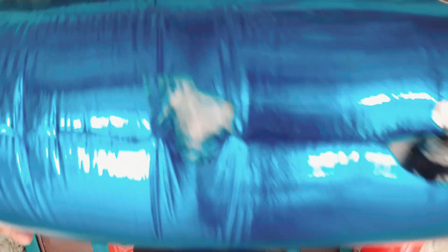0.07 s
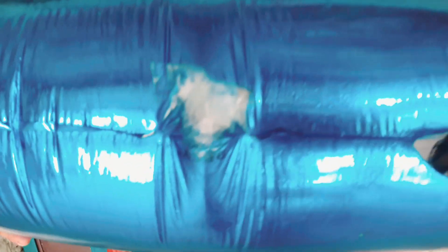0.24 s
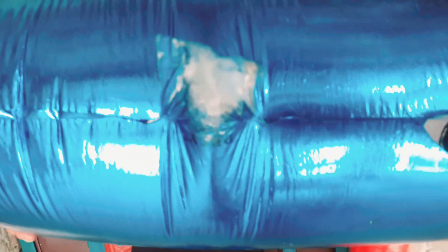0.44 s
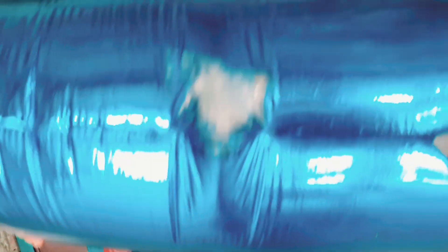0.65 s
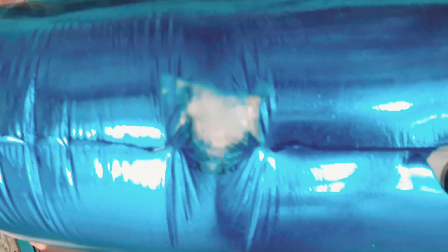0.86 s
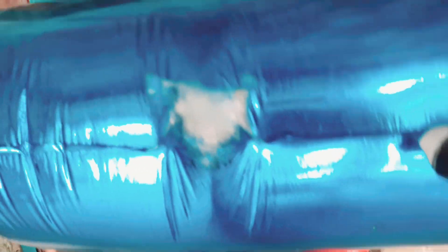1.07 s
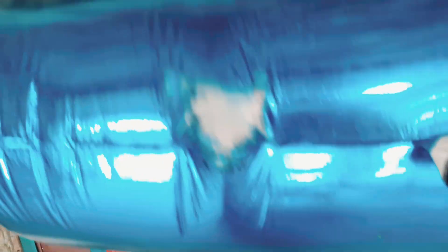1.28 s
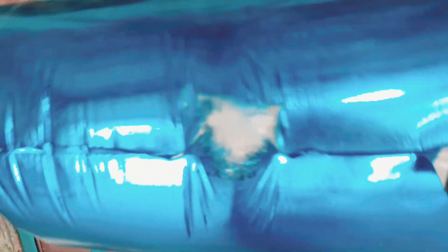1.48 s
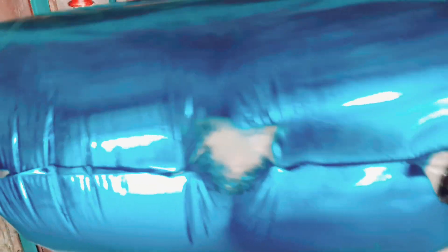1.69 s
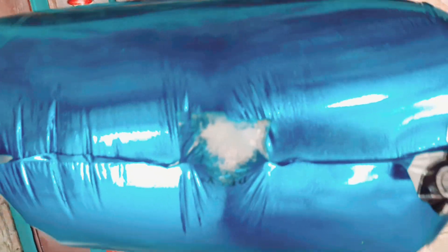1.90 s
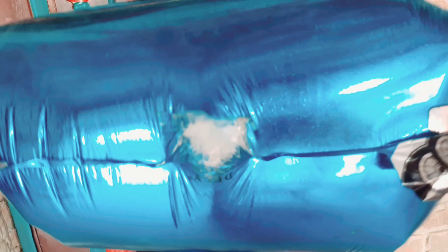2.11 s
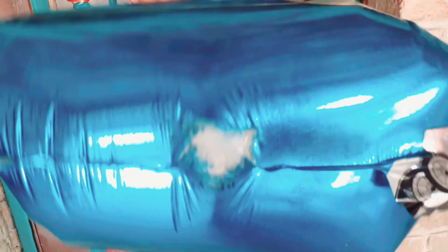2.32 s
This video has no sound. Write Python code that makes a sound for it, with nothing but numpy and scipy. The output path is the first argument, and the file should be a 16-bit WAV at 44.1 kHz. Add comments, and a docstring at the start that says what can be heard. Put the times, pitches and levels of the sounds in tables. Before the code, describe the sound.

Air pumped through a foil balloon's valve, humming hoarsely with a bright hiss.

```python
"""The flat valve of a foil balloon hums hoarsely, close up, as a pump blows air through it.
Its fluttering lips sink in pitch as the flow grows and chop the hiss of the jet into puffs.
The foil crinkles a little, the slit whistles faintly as it opens, and turbulence booms in the balloon.
Then the hum sputters out and the valve relaxes to a thin buzz."""
import sys
import numpy as np
from scipy import signal
from scipy.fft import rfft, irfft
from scipy.io import wavfile

SR = 44100
rng = np.random.default_rng(int(sys.argv[2]) if len(sys.argv) > 2 else 0)


def generate_wav(signal):
    """Clip the signal to [-1, 1] and save it as 16-bit WAV at the path in sys.argv[1]."""
    frames = np.transpose(np.atleast_2d(signal))
    scaled = np.clip(frames, -1, 1) * 32767
    pcm = np.round(scaled).astype(np.int16)
    wavfile.write(sys.argv[1], SR, pcm)


N = 108045
T = np.arange(N) / SR
HZ = np.maximum(np.arange(N // 2 + 1) * SR / N, 1)

# Flutter rate of the lips. Each row: time in seconds, pitch in Hz.
LIP_PITCH = [(.14, 440), (.2, 451.7), (.25, 403.8), (.31, 402.3), (.35, 413.4), (.41, 378), (.56, 381),
             (.65, 394), (.71, 390.2), (.755, 364.4), (.79, 381.1), (.88, 364), (1.01, 351.7),
             (1.13, 360.5), (1.21, 373.6), (1.36, 381.7), (1.49, 380), (1.53, 391), (1.66, 394.7),
             (1.7, 411), (1.82, 416.7), (1.95, 428.3), (2.05, 422.8), (2.28, 414.7), (2.45, 390.6)]
# Unsteadiness of the flutter. Each row: time in seconds, factor on jitter and flicker.
LIP_ROUGHNESS = [(0, 1.5), (.42, 0.86), (.52, 0.81), (.7, 0.65), (.8, 1.25), (.92, 0.87), (1.1, 0.55),
                 (1.3, 0.87), (1.55, 1.1), (1.72, 2.03), (1.92, 0.71), (2.2, 0.28), (2.45, 0.4)]
# Envelopes of the jet. Each row: time in seconds, treble and middle level in dB before their trims.
HISS_LEVELS = [(0.0, -50, -41), (0.09, -44.5, -42), (0.21, -41, -37.5), (0.23, -37.5, -32.5),
               (0.31, -37, -30.5), (0.39, -33.5, -35.5), (0.4, -31, -30.5), (0.42, -35.5, -34),
               (0.57, -34.5, -31.5), (0.61, -33, -33), (0.75, -26.5, -27.5), (0.78, -30.5, -31.5),
               (0.87, -28, -29.5), (1.12, -31, -30.5), (1.19, -28.5, -28), (1.49, -30.5, -32),
               (1.55, -29, -30.5), (1.63, -32.5, -34.5), (2.3, -32, -38.5), (2.45, -38, -39.5)]


def from_db(db):
    """Decibels to gain."""
    return 10 ** (np.asarray(db) / 20)


def rms_one(x):
    """Scale to rms 1."""
    return x / np.sqrt(np.mean(x ** 2) + 1e-20)


def in_time(rows, column=1):
    """One column of a control curve, at every sample."""
    rows = np.array(rows)
    return np.interp(T, rows[:, 0], rows[:, column])


def at_hz(points):
    """A spectrum table at every frequency."""
    hz, value = np.transpose(points)
    return np.interp(np.log(HZ), np.log(hz), value)


def drift(rate_hz):
    """Smooth random wobble of rms 1, mostly slower than rate_hz."""
    spectrum = rfft(rng.standard_normal(N))
    return rms_one(irfft(spectrum / (1 + (HZ / rate_hz) ** 2), N))


def air(colour):
    """Coloured stereo noise of rms 1."""
    # Likeness of left and right. Each row: frequency in Hz, correlation from 0 to 1.
    likeness = [(60, 0.69), (400, 0.81), (1300, 0.57), (2300, 0.22), (3500, 0.44), (6000, 0.21),
                (9000, 0.13), (12000, 0.086), (15000, .2)]
    alike = np.clip(at_hz(likeness), 0, 1)
    left, unrelated = rfft(rng.standard_normal((2, N))) * from_db(at_hz(colour))
    right = alike * left + np.sqrt(1 - alike ** 2) * unrelated
    return rms_one(irfft(np.array([left, right]), N))


def lip_flutter(jitter_rad=0.085):
    """Phase of the valve's lips, whose cycles run a little early or late."""
    jitter = jitter_rad * in_time(LIP_ROUGHNESS) * drift(46)
    return 2 * np.pi * np.cumsum(in_time(LIP_PITCH)) / SR + jitter


def jet_hiss(phase, tick_hz=45):
    """The jet's bright hiss, chopped into puffs by the lips, with tiny snaps of the foil in it."""
    # The two bands of hiss. Each row: frequency in Hz, relative level in dB.
    treble_colour = [(200, -60), (4500, -9), (6200, -5.5), (7400, 0), (8500, 1.5), (9600, -3), (10800, -5),
                     (12400, 0), (14000, -.5), (15600, -6.5)]
    middle_colour = [(200, -76), (1300, -7), (1900, -3), (2300, 2), (2750, 2.5), (3200, 0), (3700, 1.5),
                     (4600, 1), (5700, -3), (6400, -6.5), (8000, -5.5)]
    # How hard the lips chop the jet. Each row: time in seconds, depth from 0 to 1.
    chop_depth = [(0, 1), (.4, 0.13), (.72, 0.82), (.92, 0.96), (1.25, 0.47), (1.7, 0.7), (2.05, 0.1),
                  (2.3, 0.01)]
    opening = np.cos(phase) + 0.89 * np.cos(2 * phase)
    puffs = rms_one(np.exp(in_time(chop_depth) * opening / 2))
    treble_gain = from_db(in_time(HISS_LEVELS) + 6)
    middle_gain = from_db(in_time(HISS_LEVELS, column=2) + 4.5)
    treble = treble_gain * relaxed_hollow(slit_resonances(air(treble_colour)))
    middle = middle_gain * slit_resonances(air(middle_colour))
    ticks = (rng.random(N) < tick_hz / SR) * rng.standard_normal(N) * from_db(6.5)
    snaps = treble_gain * signal.lfilter([1, -1], [1, -.7, .25], ticks)
    flow_db = spurts_db() + 0.26 * stalls_db() + 0.79 * drift(77)
    return (treble + middle + snaps) * puffs * from_db(flow_db)


def slit_resonances(noise, combs=9, band_hz=330, swell_db=1.6):
    """Narrow resonances of the slit swell and fade in the hiss, as interleaved combs of bands."""
    comb_of_bin = (HZ // band_hz) % combs
    spectrum = rfft(noise)
    bands = (irfft(spectrum * (comb_of_bin == k), N) for k in range(combs))
    return rms_one(sum(band * from_db(swell_db * drift(9)) for band in bands))


def turbulence():
    """Eddies boom in the balloon, over a low rush of air and a rumble."""
    # Envelopes of the three layers. Each row: time in seconds, level in dB before the trim.
    boom_level = [(0, -48.5), (.37, -36.5), (.415, -25), (.52, -47), (.6, -31.5), (.7, -40), (.79, -29),
                  (.92, -39), (1.3, -58), (1.5, -42.5), (1.65, -38), (1.8, -43), (1.92, -53), (2.45, -69)]
    rush_level = [(0.0, -43.5), (0.59, -37), (0.68, -42), (0.72, -30), (1.17, -38), (1.49, -33),
                  (2.22, -43.5), (2.45, -41.5)]
    rumble_level = [(0.0, -49.5), (0.55, -45.5), (0.62, -52), (1.49, -53.5), (1.51, -39), (1.55, -58),
                    (2.24, -66), (2.45, -60)]
    # Their tone. Each row: frequency in Hz, relative level in dB.
    boom_colour = [(100, -47), (200, -23.5), (280, -13), (345, 3.5), (410, -6), (470, -12.5), (600, -16.5),
                   (1000, -28)]
    rush_colour = [(30, -38), (130, -21.5), (220, -7), (450, -0.5), (570, -1), (660, -2), (800, -5.5),
                   (1000, -3.5), (1230, -1), (1550, 0.5), (1850, -5), (2600, -17)]
    rumble_colour = [(22, -42), (45, -14), (65, -7.5), (120, -3), (160, -11), (300, -1.5), (600, -43)]
    boom = from_db(in_time(boom_level) + 4) * air(boom_colour)
    rush = from_db(in_time(rush_level) + 2) * air(rush_colour)
    rumble = from_db(in_time(rumble_level) + 2.5 + 0.83 * drift(15)) * air(rumble_colour)
    return boom + rush + rumble


def foil_crinkles(decay_s=0.0013, left_db=-7, right_db=2):
    """The handled foil crackles in short, sharp bursts."""
    # Crackles. Each row: start in seconds, peak in dB before the left and right trims.
    crackles = [(0.018, -17), (0.117, -19.5), (0.15, -16.5), (0.221, -22), (0.723, -16)]
    # Tone of the foil. Each row: frequency in Hz, relative level in dB.
    foil_colour = [(300, -15), (1200, -6), (2000, -9), (3100, 5), (4400, 3.5), (6000, -10), (15000, -8)]
    bursts = sum(from_db(db) * (T >= s) * np.exp(-np.abs(T - s) / decay_s) for s, db in crackles)
    return bursts * air(foil_colour) * from_db([[left_db], [right_db]])


def slit_whistle(width_hz=45, octave_db=-8):
    """The narrow slit gives a breathy rising whistle, with its octave, as the valve opens."""
    # The glide. Each row: time in seconds, pitch in Hz, level in dB.
    glide = [(.08, 6500, -54), (.135, 7030, -39), (.17, 7130, -39), (.22, 7350, -48), (.32, 8150, -39),
             (.38, 8400, -46)]
    phase = 2 * np.pi * np.cumsum(in_time(glide)) / SR
    tone = 0
    for k, db in (1, 0), (2, octave_db):
        narrow_noise = drift(width_hz) * np.cos(k * phase) + drift(width_hz) * np.sin(k * phase)
        tone += from_db(db) * narrow_noise
    return from_db(in_time(glide, column=2)) * tone * (T < glide[-1][0])


def valve_hum(phase, wander_rad=.43, flicker_db=3.5):
    """The fluttering lips hum, slap shut and buzz like a reed; rough flutter breaks up the tone."""
    # The fundamental. Each row: time in seconds, level in dB.
    hum_level = [(0, -64), (.13, -47.5), (.19, -33.5), (.26, -31.5), (.33, -25), (.385, -21.5), (.412, -18),
                 (.44, -22), (.52, -21.5), (.68, -19), (.83, -21), (.91, -15.5), (1.14, -15), (1.21, -20),
                 (1.33, -23), (1.41, -21), (1.6, -23.5), (1.69, -31), (1.8, -38), (1.85, -48), (2.05, -50),
                 (2.2, -44.5), (2.32, -47), (2.45, -35.5)]
    # Growl from every other cycle being stronger. Each row: time in seconds, level in dB.
    growl_level = [(.7, -60), (.88, -41.5), (1.2, -56), (1.33, -43), (1.53, -41.5), (1.72, -75)]
    # Overtones of the slap. Each row: time in seconds, second and third harmonic in dB before flicker.
    slap_levels = [(.12, -60, -70), (.2, -42, -44), (.3, -39, -39.5), (.41, -34.5, -39),
                   (.55, -35.5, -35.5), (.7, -31, -38.5), (.8, -41, -33), (.89, -30, -40),
                   (1.04, -35.5, -52), (1.24, -37.5, -40.5), (1.38, -34.5, -49.5), (1.58, -39, -41.5),
                   (1.7, -41.5, -38), (1.83, -45, -42), (1.96, -42, -45), (2.06, -42, -34.5),
                   (2.15, -41.5, -46.5), (2.3, -41.5, -41.5), (2.45, -44.5, -45.5)]
    rough = in_time(LIP_ROUGHNESS)
    shimmer_db = rough * drift(47)
    tone = from_db(in_time(hum_level) + 0.26 * spurts_db() + shimmer_db) * np.cos(phase)
    tone += from_db(in_time(growl_level)) * np.cos(1.5 * phase)
    slap_gains = [from_db(in_time(slap_levels, column)) for column in (1, 2)]
    buzz_gains = [buzz_gain(k) for k in range(4, 15)]
    for k, gain in enumerate(slap_gains + buzz_gains, 2):
        wander = wander_rad * rough * drift(21) + rng.normal(0, 1)
        flicker = from_db(flicker_db * np.minimum(rough, 1) * (drift(32) - 0.29))
        tone += gain * flicker * np.cos(k * phase + wander)
    return np.sqrt(2) * tone * from_db(stalls_db())


def buzz_gain(harmonic):
    """Gain of an upper harmonic: it follows the hiss and rasps when a valve resonance catches it."""
    # Resonances of the shifting valve, each catching the nearest harmonic.
    # Each row: centre in seconds, length in seconds, frequency in Hz, level in dB.
    resonances = [(0.53, .22, 1520, -37.5), (0.516, .13, 2280, -38), (0.541, .12, 5320, -43),
                  (.55, 0.14, 2660, -41), (0.653, 0.21, 1950, -36), (0.659, 0.19, 4700, -42),
                  (0.856, 0.13, 2220, -42), (1.211, 0.15, 4470, -38.5), (1.234, 0.17, 1870, -39),
                  (1.232, 0.14, 2250, -38), (1.4, 0.33, 1530, -39), (2.21, 0.24, 2510, -47.5)]
    gain = from_db(in_time(HISS_LEVELS, column=2) - 17.5)
    for centre, length, hz, db in resonances:
        pitch_hz = np.interp(centre, *np.transpose(LIP_PITCH))
        if round(hz / pitch_hz) == harmonic:
            gain += from_db(db) * np.exp(-np.abs(2 * (T - centre) / length) ** 3)
    return gain


def stalls_db(length_s=0.017):
    """The lips stick for a moment and choke the flow, again and again as the hum sputters out."""
    # Stalls. Each row: centre in seconds, dip of the hum in dB.
    stalls = [(0.386, -3), (.786, -12), (.935, -3), (1.623, -4), (1.672, -12), (1.719, -17), (1.772, -7)]
    return sum(db * np.exp(-(2 * (T - centre) / length_s) ** 2) for centre, db in stalls)


def spurts_db():
    """The valve pops wider for a moment and the flow swells."""
    # Spurts. Each row: centre in seconds, length in seconds, boost of the hiss in dB.
    spurts = [(0.401, 0.017, 4.5), (0.582, 0.043, 2), (1.601, .012, 2)]
    return sum(db * np.exp(-(2 * (T - centre) / length) ** 2) for centre, length, db in spurts)


def relaxed_hollow(noise, fade_s=(1.35, 1.9), centre_hz=7556, width_hz=1100, depth_db=-9):
    """A dip opens in the treble of the hiss as the valve relaxes."""
    dip = from_db(depth_db * np.exp(-((HZ - centre_hz) / width_hz) ** 2))
    hollow = irfft(rfft(noise) * dip, N)
    return noise + np.interp(T, fade_s, [0, 1]) * (hollow - noise)


def scene():
    """The balloon is on the left: the right channel hears it later and shaded."""
    # Shading of the right channel. Each row: frequency in Hz, gain in dB.
    right_shade = [(60, 2.9), (160, 0), (380, -2.2), (700, 0.8), (1500, 1), (2600, -4.5), (3800, -2.5),
                   (6000, -3.5), (7200, -9), (8200, -24), (10000, -25), (11300, -11), (12300, -11),
                   (13600, -18), (15500, -9)]
    # Its delay. Each row: frequency in Hz, phase lag in radians.
    right_lag = [(100, -1), (400, 0.7), (800, 0.83), (1400, 1.73), (1800, 4), (2300, 4.5), (2700, 7),
                 (3200, 9), (4200, 13.5), (5000, 13), (6300, 15), (8500, 21), (10500, 27.5), (13000, 33.5)]
    phase = lip_flutter()
    left, right = valve_hum(phase) + jet_hiss(phase) + turbulence() + slit_whistle() + foil_crinkles()
    far_side = from_db(at_hz(right_shade)) * np.exp(-1j * at_hz(right_lag))
    return np.array([left, irfft(rfft(right) * far_side, N)])


def record(dry):
    """A steep low-pass cuts off the very top."""
    cutoff_hz = 15720
    return signal.sosfilt(signal.ellip(12, .1, 80, cutoff_hz, fs=SR, output="sos"), dry)


dry = scene()
out = record(dry)
generate_wav(out)
```